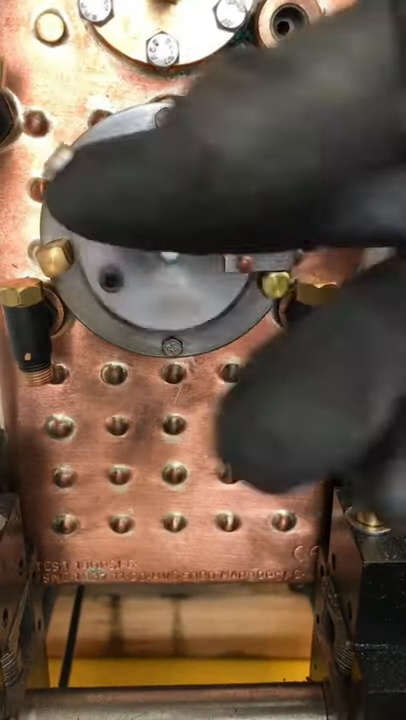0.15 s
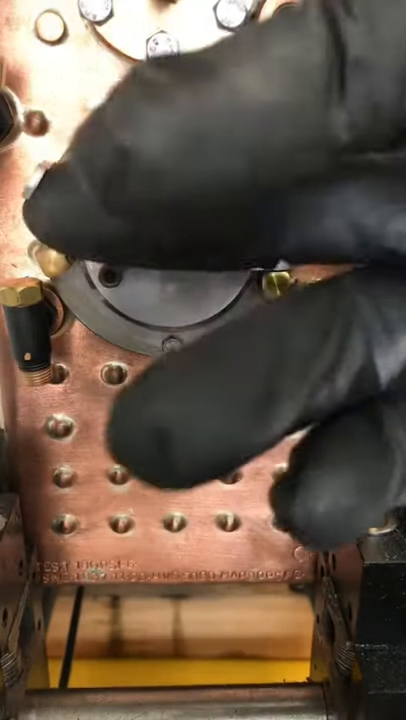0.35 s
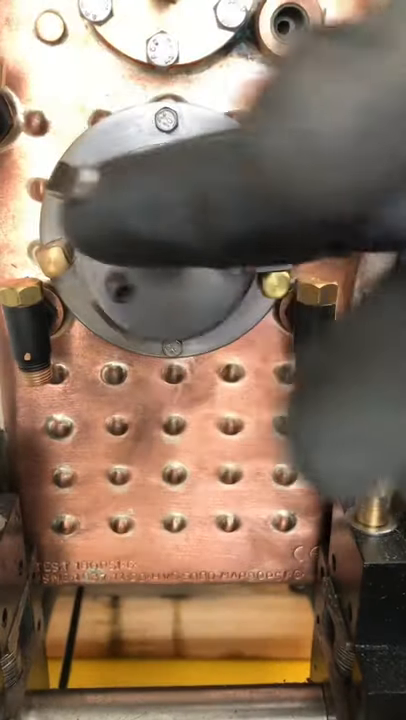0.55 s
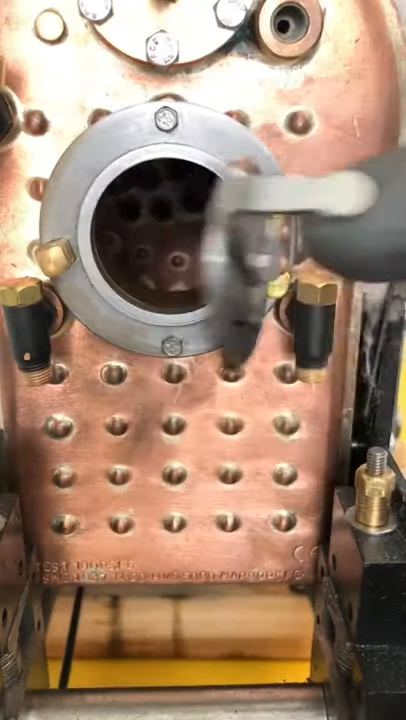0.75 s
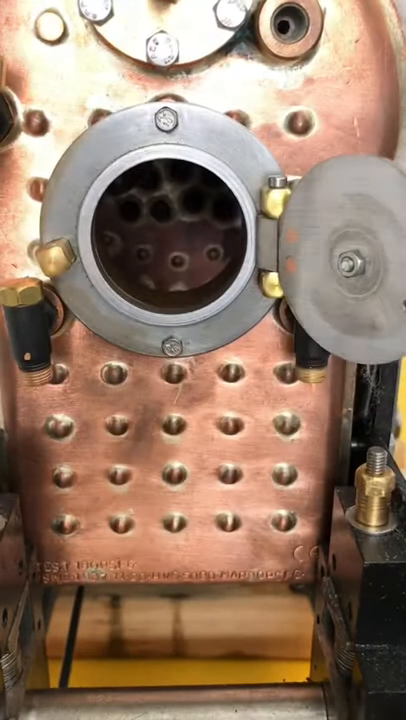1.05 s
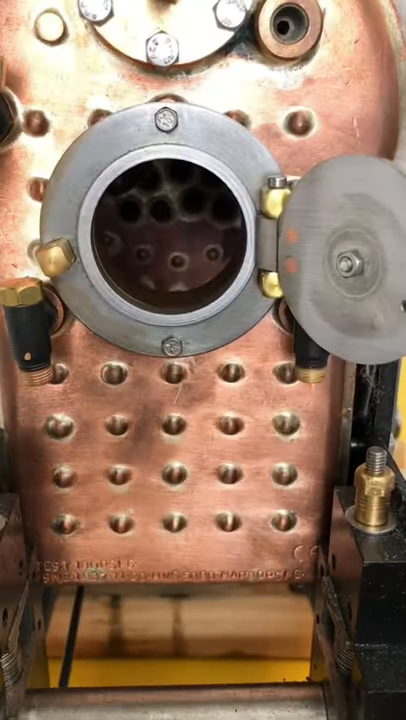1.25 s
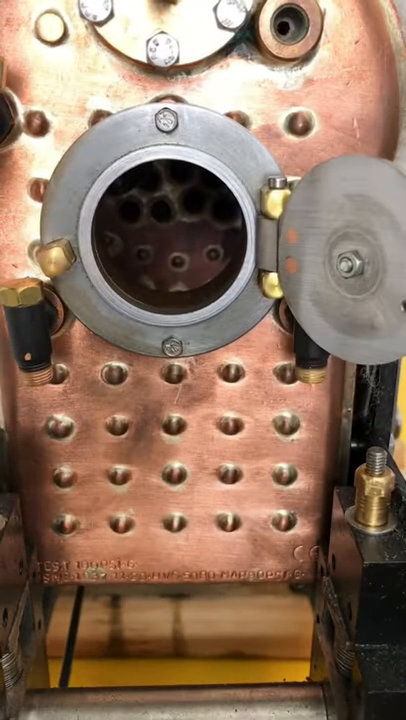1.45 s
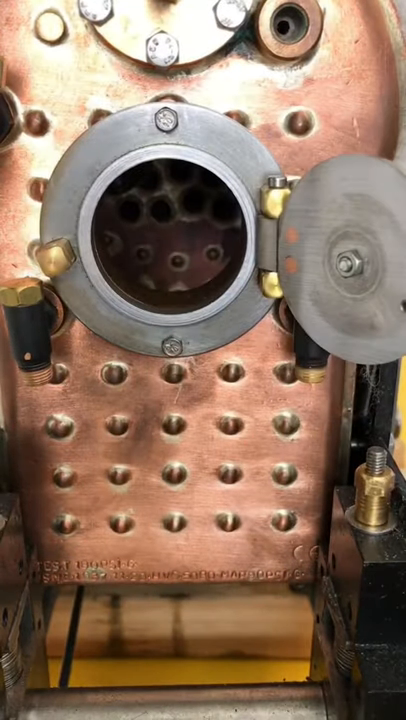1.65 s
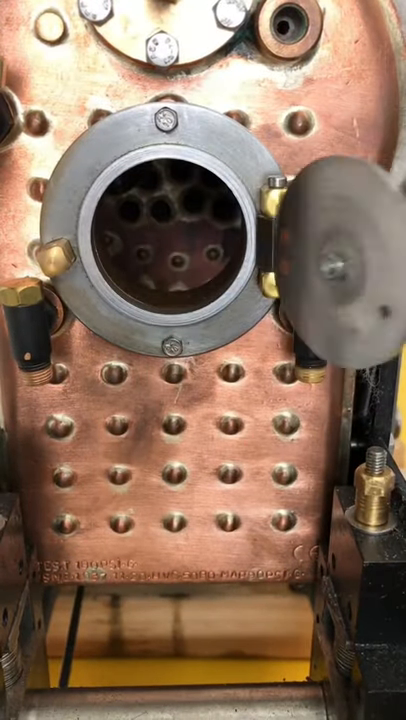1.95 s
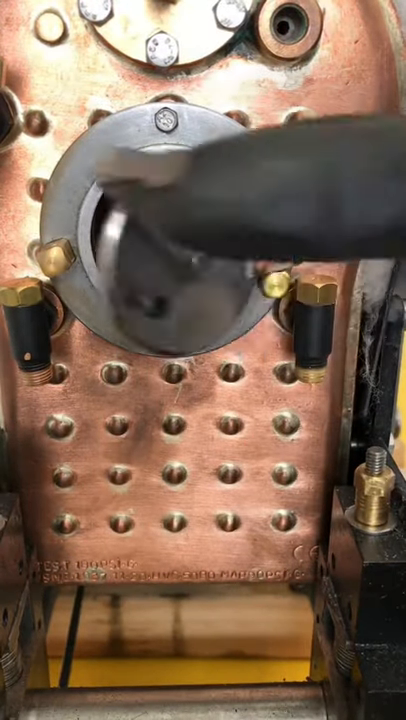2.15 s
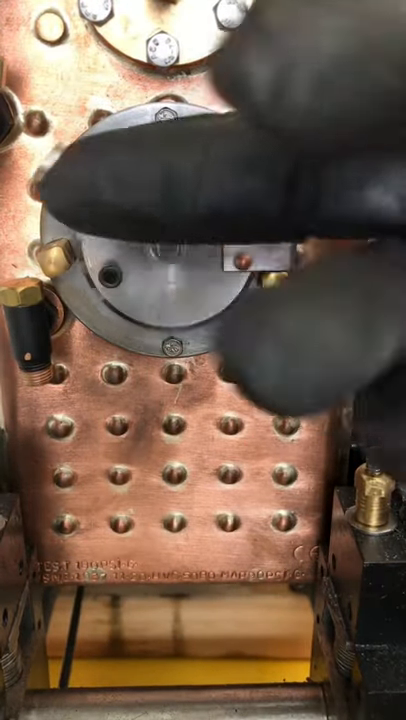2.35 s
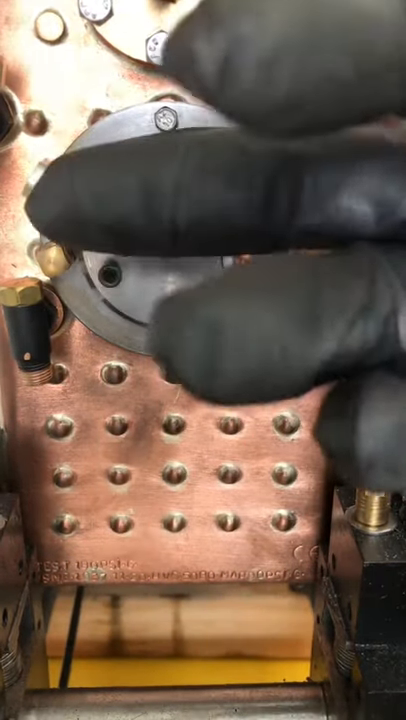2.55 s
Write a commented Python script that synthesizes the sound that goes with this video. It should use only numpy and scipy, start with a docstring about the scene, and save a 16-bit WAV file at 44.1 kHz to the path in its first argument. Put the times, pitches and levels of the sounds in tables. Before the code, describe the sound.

Sharp metallic clack of a little boiler door closing, gloved fingers rustling and ticking, the door ticking open to its stop, a soft double tap, then a second, shorter clack over low hum and thin motor whine.

```python
"""A low hum, a thin motor whine and rumbling air fill a small room throughout; a glove rustles and ticks.
Close by, the small steel fire door of a miniature copper boiler is pushed shut: noise bursts and decaying modes.
It swings open with hinge ticks, then meets its stop; faint chirps and a soft double tap follow, all shaped noise.
The glove slides and ticks again, and a second push shuts the door with a clack that dies faster under the hand."""
import sys
import numpy as np
from scipy import signal
from scipy.fft import rfft, irfft, next_fast_len
from scipy.io import wavfile
from scipy.ndimage import map_coordinates

SR = 44100
rng = np.random.default_rng(int(sys.argv[2]) if len(sys.argv) > 2 else 0)


def digitize_waveform(pressure):
    """Quantize a signal to 16-bit integers and store it at the path in sys.argv[1].

    Rows of a 2-D input are taken as channels; values are limited to [-1, 1].
    """
    field = np.atleast_2d(pressure).T
    bounded = np.clip(field, -1, 1)
    quanta = np.round(bounded * 32767).astype(np.int16)
    wavfile.write(sys.argv[1], SR, quanta)


N = 119070  # samples in the scene

# Noise spectrum of small hinge contacts, also of the door's chatter: f/Hz, relative level/dB per Hz
HINGE_SPECTRUM = [(1000, -26.5), (2500, 0.5), (3800, 13.5), (5500, -12), (8000, -11), (15000, -19)]


def amp(db):
    """Amplitude ratio: the inverse of the decibel scale, 20 dB to a factor of ten."""
    return 10 ** (np.asarray(db) / 20)


def unit(x):
    """Normalisation to an effective (rms) value of 1."""
    return x / np.sqrt(np.mean(x ** 2) + 1e-20)


def along(points, hz):
    """Interpolation of (frequency, value) points on a logarithmic frequency axis."""
    f, v = np.transpose(points)
    return np.interp(np.log(hz + 1), np.log(f + 1), v)


def curves(rows):
    """Linear interpolation in time: one curve for each column after t."""
    s, *columns = np.transpose(rows)
    t = np.arange(N) / SR
    return [np.interp(t, s, column) for column in columns]


def wobble(rate):
    """Slow random modulation: a spline through normal deviates, rate knots a second."""
    knots = rng.standard_normal(int(N * rate / SR) + 4)
    return map_coordinates(knots, [np.arange(N) * rate / SR])


def filtered(x, response):
    """Linear filtering: the spectrum multiplied by a response of frequency."""
    m = next_fast_len(len(x) + 8192)  # zero padding limits wrap-around
    hz = np.fft.rfftfreq(m, 1 / SR)
    return irfft(rfft(x, m) * response(hz), m)[:len(x)]


def tilt(hz, slope_db):
    """Spectral tilt: a gain in dB per octave, pivoting at 3900 Hz."""
    return amp(slope_db * np.log2((hz + 100) / 4000))


def noise(spectrum, size, slope_db=0):
    """Coloured noise of rms 1: white noise shaped by a spectral density."""
    white = rng.standard_normal(size)
    return unit(filtered(white, lambda hz: amp(along(spectrum, hz)) * tilt(hz, slope_db)))


def fade(t60):
    """Exponential decay of a damped system, 60 dB in t60 seconds, computed for one second."""
    return amp(-60 * np.arange(SR) / SR / t60)


def burst(spectrum, t60, slope_db=0):
    """Impact noise: a dense crowd of modes excited at once and damped exponentially."""
    return noise(spectrum, SR, slope_db) * fade(t60)


def add(track, s, sound):
    """Superposition: a sound is summed into a track at time s."""
    part = track[max(round(s * SR), 0):][:len(sound)]
    part += sound[:len(part)]


def tone(hz):
    """Frequency modulation: a sine of rms 1 whose phase integrates a pitch curve."""
    cycles = np.cumsum(hz) / SR + rng.random()
    return np.sqrt(2) * np.sin(2 * np.pi * cycles)


def swells(rows):
    """Gaussian envelopes: bell-shaped rises and falls of level."""
    t = np.arange(N) / SR
    return sum(amp(db) * np.exp(-.5 * ((t - s) / width) ** 2) for s, width, db in rows)


def contacts(rows, spectrum, t60):
    """Brief impacts: each contact starts a damped noise burst."""
    out = np.zeros(N)
    for s, db in rows:
        add(out, s, amp(db) * burst(spectrum, t60))
    return out


def room_air():
    """Stationary broadband noise, described by its spectral density."""
    # Air spectrum: f/Hz, relative level/dB per Hz
    air_spectrum = [(20, -39.5), (50, -22), (100, -1.5), (160, -3), (250, -6.5), (340, -7.5), (400, -11.5),
                    (505, -6.5), (600, -13), (730, -15), (1080, -8.5), (1300, -14.5), (1800, -17),
                    (2700, -22.5), (5000, -27), (8000, -31.5), (11500, -34.5), (13000, -37.5), (15800, -37)]
    return amp(-60) * noise(air_spectrum, N)


def rumble():
    """Amplitude modulation of low-frequency noise by a slow level curve."""
    # Rumble spectrum: f/Hz, relative level/dB per Hz
    rumble_spectrum = [(20, -43), (38, -17), (54, -1.5), (70, 3.5), (85, -8.5), (115, -1.5), (150, -8),
                       (220, -23.5), (500, -60)]
    # Rumble course: t/s, relative level/dB
    rumble_course = [(0.0, -60), (0.17, -75.5), (0.22, -66.5), (0.68, -65.5), (0.87, -62.5), (1.04, -64),
                     (1.43, -61.5), (1.91, -68), (2.0, -64.5), (2.14, -67), (2.2, -59), (2.44, -71),
                     (2.47, -63), (2.7, -63)]
    gain_db = 4.5
    (level_db,) = curves(rumble_course)
    return amp(gain_db + level_db) * noise(rumble_spectrum, N)


def hum():
    """A low sine modulated in frequency and amplitude."""
    # Hum course: t/s, f/Hz, relative level/dB
    hum_course = [(0.0, 96, -67.5), (0.13, 102, -54), (0.61, 100.4, -59), (0.74, 110.7, -62),
                  (0.92, 100.8, -56.5), (0.95, 100.5, -65), (1.41, 101.8, -52.5), (1.78, 101.7, -56.5),
                  (1.97, 100.4, -75), (2.05, 106.1, -54.5), (2.12, 108.1, -68.5), (2.26, 101.5, -53),
                  (2.42, 100.9, -62), (2.7, 102.2, -55)]
    gain_db, waver_db, waver_knots_per_s = -1, 1.5, 27
    hz, level_db = curves(hum_course)
    return amp(gain_db + level_db + waver_db * wobble(waver_knots_per_s)) * tone(hz)


def motor_whine():
    """A carrier tone with upper sidebands, each line wavering in level independently."""
    # Whine pitch: t/s, f/Hz
    whine_pitch = [(0, 973.4), (1.1, 976), (1.6, 975.5), (2.3, 988.6), (2.7, 987)]
    # Carrier and sidebands: offset in sideband spacings, mean level/dB
    whine_lines = [(0, -65), (1, -72.5), (2.001, -78)]
    sideband_hz, waver_db, waver_knots_per_s = 56, 0.45, 25
    (hz,) = curves(whine_pitch)
    out = np.zeros(N)
    for k, db in whine_lines:
        out += amp(db + waver_db * wobble(waver_knots_per_s)) * tone(hz + k * sideband_hz)
    return out


def room(x):
    """Reverberation: convolution with decaying noise whose decay time depends on frequency."""
    # Room decay: f/Hz, t60/s
    room_decay = [(200, .18), (2000, 0.13), (6000, 0.21), (14000, .14)]
    hz, t, cells = signal.stft(rng.standard_normal(SR // 2), SR, nperseg=256)
    decay = amp(-60 * t / along(room_decay, hz)[:, None])
    tail = signal.istft(cells * decay, SR, nperseg=256)[1]
    response = np.pad(tail / np.linalg.norm(tail), (SR // 200, 0))  # unit energy, 5 ms late
    return signal.fftconvolve(x, response)[:N]


def chirps():
    """Narrow-band noise under Gaussian envelopes gives faint squeaks high in the treble."""
    # Chirps: middle t/s, standard deviation of the bell/s, peak level/dB
    chirp_times = [(1.355, 0.017, -75), (1.525, .018, -73), (1.71, 0.027, -79.5)]
    # Chirp spectrum: f/Hz, relative level/dB per Hz
    chirp_spectrum = [(9500, -49.5), (10800, -5), (11150, 1.5), (11500, -21), (12800, -47.5)]
    return swells(chirp_times) * noise(chirp_spectrum, N)


def taps():
    """Damped impact noise without tonal modes gives a soft, dull double tap."""
    # Taps: t/s, level/dB, treble tilt/dB per octave
    tap_times = [(1.519, -51, -2), (1.5257, -49.5, 0.5)]
    # Tap spectrum: f/Hz, relative level/dB per Hz
    tap_spectrum = [(200, -18), (600, -6.5), (900, 4.5), (1900, 2), (3200, -8), (5500, -4.5), (11000, -14),
                    (15500, -22)]
    tap_t60_s = 0.1
    out = np.zeros(N)
    for s, db, slope_db in tap_times:
        add(out, s, amp(db) * burst(tap_spectrum, tap_t60_s, slope_db))
    return out


def glove():
    """Stick-slip friction: slides make grainy modulated noise, single releases make ticks."""
    # Releases, where the glove sticks and lets go: t/s, level/dB
    glove_ticks = [(.0792, -55), (.1271, -49), (.157, -51), (.5902, -58), (.7294, -53.5), (2.0311, -56),
                   (2.1, -71), (2.1349, -53), (2.2496, -51.5), (2.2861, -56.5)]
    # Slides: middle t/s, standard deviation of the bell/s, peak level/dB
    rubs = [(.08, 0.18, -68.5), (.7, .1, -71), (.98, 0.11, -74.5), (2.1, 0.076, -66.5),
            (2.569, .009, -63.5)]
    # Glove spectrum: f/Hz, relative level/dB per Hz
    glove_spectrum = [(1000, -24), (3500, -3.5), (6000, -0.5), (8000, 0.5), (11000, -5.5), (15500, -12)]
    tick_t60_s, grain_db, grain_knots_per_s = 0.0083, 3, 400
    grain = amp(grain_db * wobble(grain_knots_per_s))
    rustle = unit(noise(glove_spectrum, N) * grain)
    return swells(rubs) * rustle + contacts(glove_ticks, glove_spectrum, tick_t60_s)


def door_swing():
    """Small impacts: dry ticks in the hinge, then longer-lived knocks on the hinge stop."""
    # Hinge ticks: t/s, level/dB
    hinge_ticks = [(.8162, -55.5), (.9534, -57), (1.0098, -56), (1.0407, -53.5), (1.0692, -53)]
    # Contacts with the stop: t/s, level/dB
    stop_contacts = [(1.084, -44), (1.0925, -47.5)]
    # Stop spectrum: f/Hz, relative level/dB per Hz
    stop_spectrum = [(150, -5), (320, 7), (600, -19), (1300, -14), (1650, 9.5), (2000, -10), (2450, 3),
                     (2850, -5), (3300, -1.5), (4400, -0.5), (5500, -4), (7000, -20), (8000, -7),
                     (10000, -25), (15500, -23)]
    hinge_t60_s, stop_t60_s = 0.011, 0.059
    hinge = contacts(hinge_ticks, HINGE_SPECTRUM, hinge_t60_s)
    return hinge + contacts(stop_contacts, stop_spectrum, stop_t60_s)


def door_clacks():
    """Modal superposition: metal contact cracks, chatters, shakes the plate and rings door and frame."""
    # Clacks: t/s, relative level/dB, the glove's added damping/dB per s, treble tilt/dB per octave
    clacks = [(0.2296, -1.34, 0, -0.5), (2.3921, -4, 31.5, -0.5)]
    # Modes of door and frame: f/Hz, relative level/dB, t60/s without the glove's damping
    door_modes = [(497, -32, .07), (800, -28, .042), (1397, -27, .045), (1468, -44, .33), (1637, -38, .2),
                  (1672, -20, .05), (1818, -42, .46), (1840, -46, .25), (2231, -48, .2), (2420, -38, .1),
                  (2573, -43, .17), (3402, -49, .4), (3480, -35, .12), (3505, -46, .28), (3555, -46, .45),
                  (3671, -46, .3), (3784, -35, .17), (3842, -22, .06), (4040, -24, .055), (4325, -21, .065),
                  (4350, -47, .25), (4422, -21, .055), (5022, -53, 1.0), (5045, -48, .45), (5054, -25, .07),
                  (5135, -28, .05), (5243, -46, .2), (5485, -25, .065), (5728, -41, .2), (6218, -45, .16),
                  (6820, -29, .11), (7775, -26, .07), (8150, -27, .09), (8350, -40, .23), (8510, -44, .2),
                  (9518, -27, .045), (10080, -58, .35), (11270, -48, .14), (11915, -23, .045),
                  (15090, -51, .26), (15660, -26, .045)]
    # Crowd of short-lived modes of the boiler plate: f/Hz, relative level/dB per Hz
    plate_spectrum = [(60, -22), (250, -14.5), (450, -6.5), (780, -2.5), (890, -11.5), (1300, -3),
                      (1700, 0.5), (2050, 0), (3000, -11.5), (3600, -2.5), (4400, -2.5), (4800, 4.5),
                      (6200, 0.5), (8000, 3), (9600, -10), (11500, -0.5), (16000, -5)]
    # Contact crack: f/Hz, relative level/dB per Hz
    crack_spectrum = [(100, -17), (500, -1.5), (900, -3.5), (1300, 11), (2200, -5.5), (3000, -10.5),
                      (5000, 4.5), (6500, 0.5), (9500, 2), (11500, 11), (15000, -3.5)]
    # Chatter on the seat: delay t/s, level relative to the crack/dB
    chatter = [(.0021, -5.5), (.0051, -4)]
    mode_rise_s, mode_scatter_db = 0.00075, 1
    plate_db, plate_t60_s = -18, .056  # t60 without the glove's damping, as below
    crack_db, crack_t60_s = -14, .013
    out, t = np.zeros(N), np.arange(SR) / SR
    rise = 1 - np.exp(-t / mode_rise_s)
    for s, db, damping_db, slope_db in clacks:
        clack = amp(plate_db) * burst(plate_spectrum, plate_t60_s, slope_db)
        for k, (hz, mode_db, t60) in enumerate(door_modes):
            gain = amp(mode_db + mode_scatter_db * rng.standard_normal()) * tilt(hz, slope_db)
            sign = (-1) ** k  # neighbours start opposed, so close pairs swell and beat
            clack += sign * gain * np.sin(2 * np.pi * hz * t) * fade(t60) * rise
        add(clack, 0, amp(crack_db) * burst(crack_spectrum, crack_t60_s, slope_db))
        for delay, touch_db in chatter:
            touch = burst(HINGE_SPECTRUM, crack_t60_s, slope_db)
            add(clack, delay, amp(crack_db + touch_db) * touch)
        add(out, s, amp(db - damping_db * t) * clack)
    return out


def scene():
    """Superposition of direct sound, its reverberation and the steady background."""
    reverb_db = -19
    background = room_air() + rumble() + hum() + motor_whine()
    near = chirps() + taps() + glove() + door_swing() + door_clacks()
    return (near + amp(reverb_db) * room(near) + background)[None]


def record(dry):
    """Band limitation: a very steep low-pass removes what lies above the recorder's top frequency."""
    top_hz = 16300  # half amplitude here
    return np.array([filtered(x, lambda hz: 1 / (1 + (hz / top_hz) ** 120)) for x in dry])


dry = scene()
out = record(dry)
digitize_waveform(out)
```